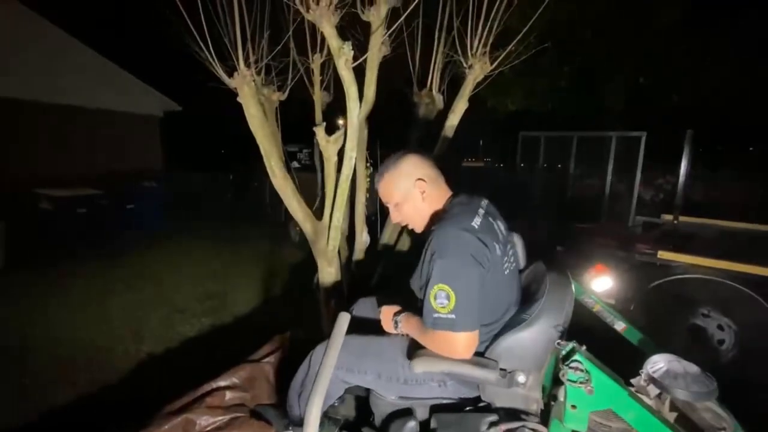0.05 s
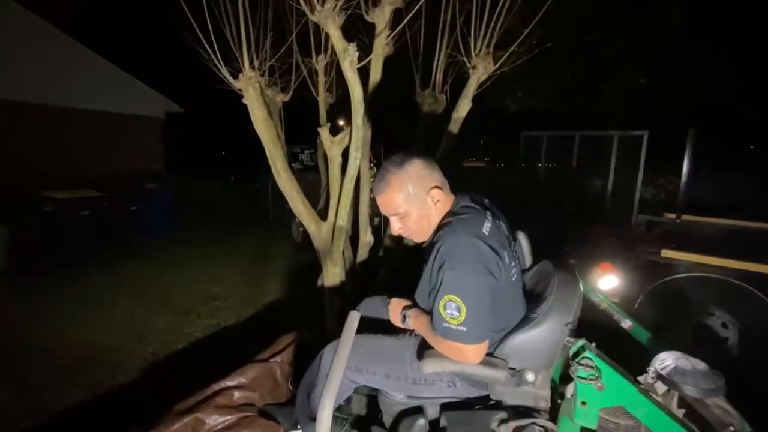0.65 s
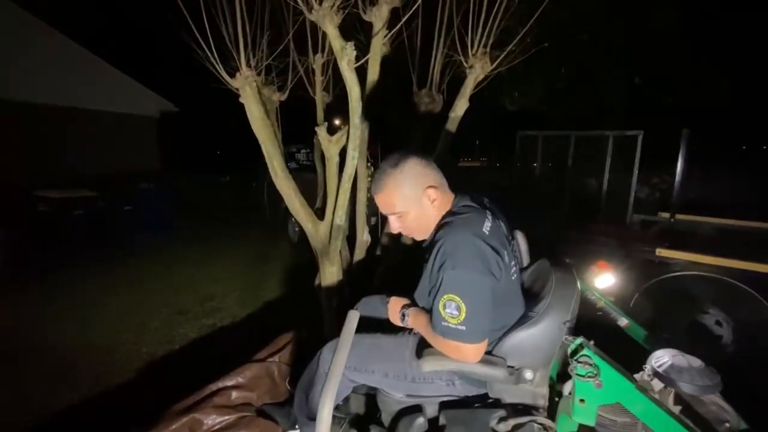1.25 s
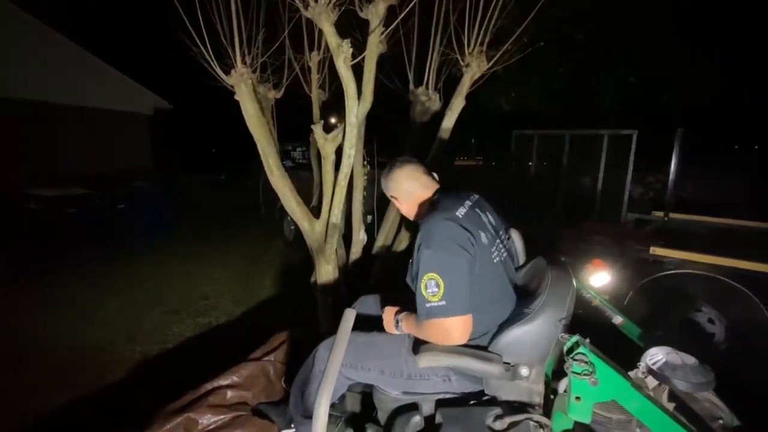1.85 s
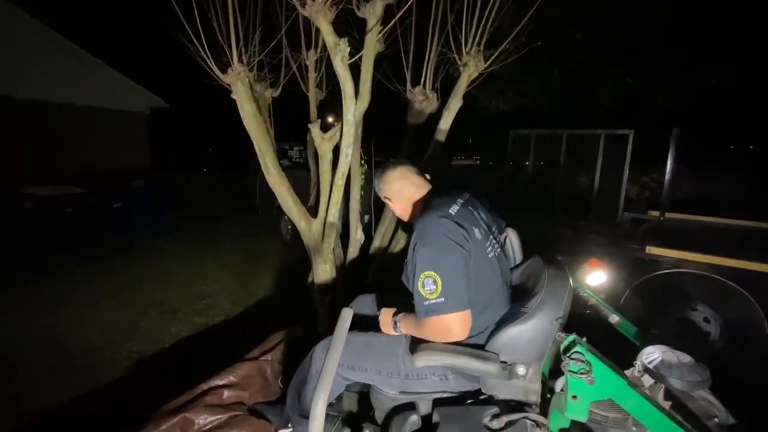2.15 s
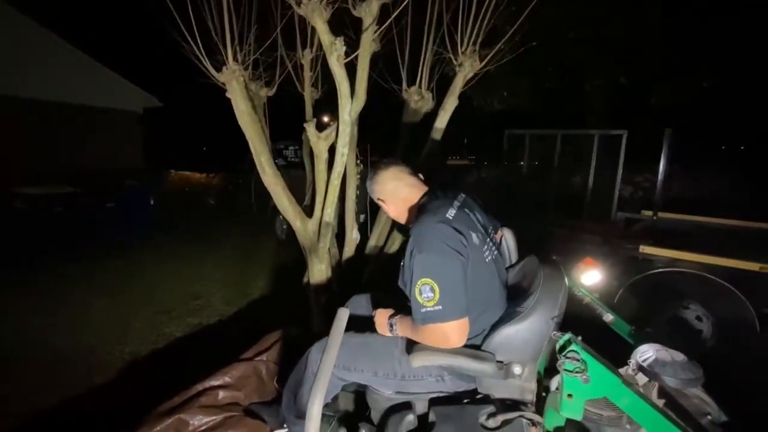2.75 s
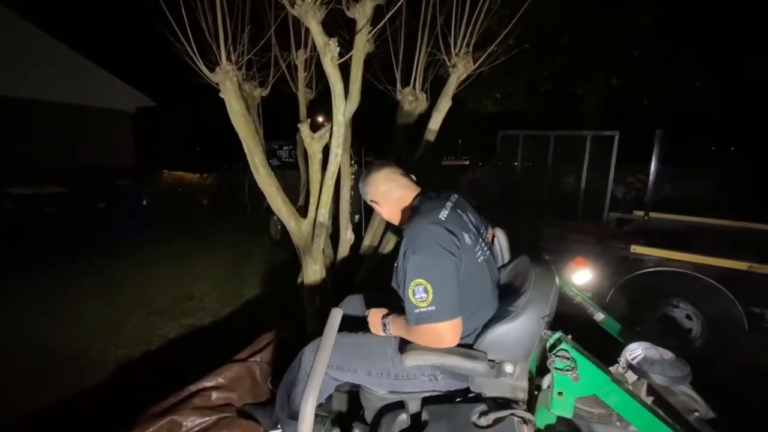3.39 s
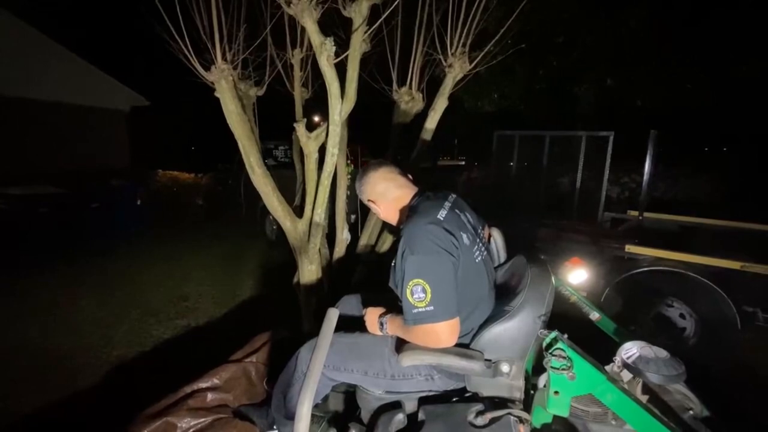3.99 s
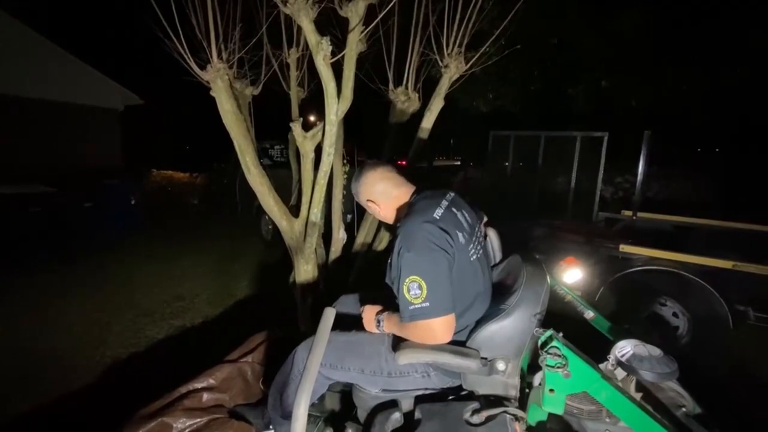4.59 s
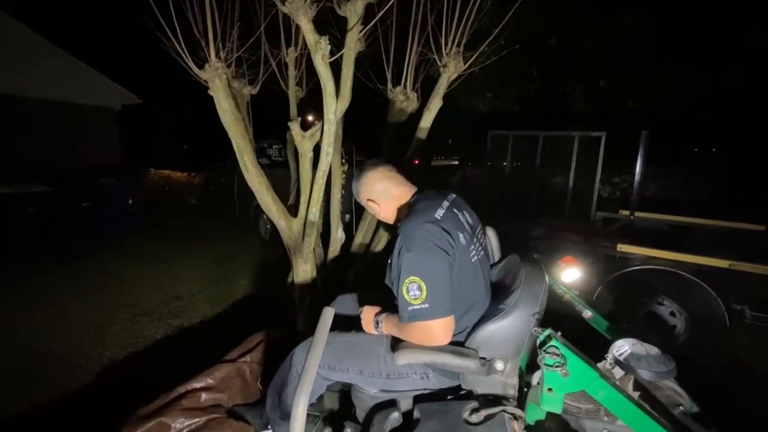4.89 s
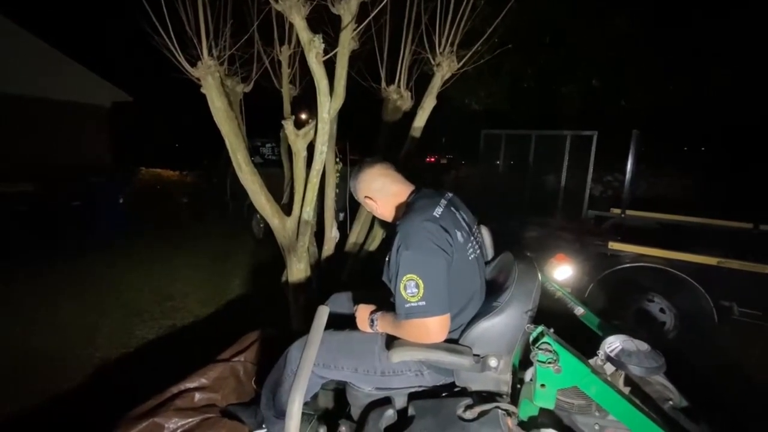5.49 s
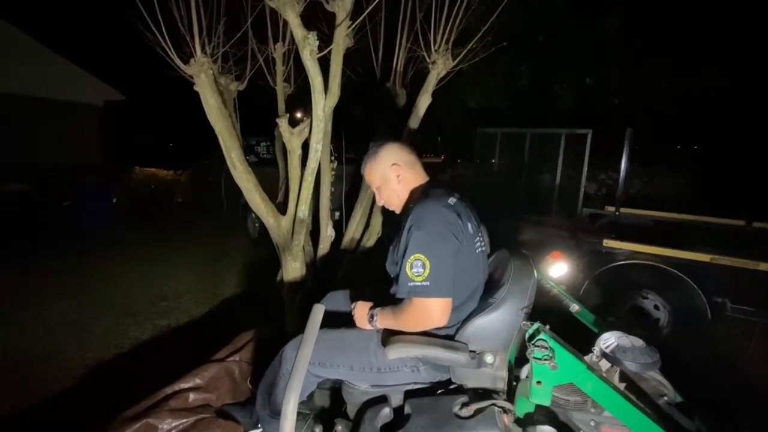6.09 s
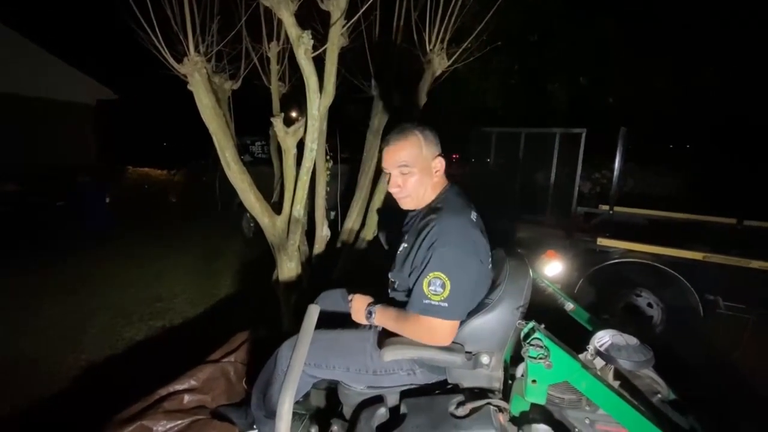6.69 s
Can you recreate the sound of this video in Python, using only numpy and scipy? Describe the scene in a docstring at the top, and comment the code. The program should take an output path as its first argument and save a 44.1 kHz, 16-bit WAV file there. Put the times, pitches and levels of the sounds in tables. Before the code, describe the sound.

A riding mower is started cold in a quiet yard, a metre or two from the microphone. The starter clanks in, grinds briefly and winds down with rattling gears and a few coughs. A second, longer try whines and chuffs without catching, then coasts to a stop. On the third try the engine fires, misses a few times and speeds up into a fast, chugging idle with mechanical clatter.

```python
"""Riding mower, cold start.

A V-twin is started outdoors at night, a metre or two from a stereo microphone. Twice the starter
slams in, grinds the engine over and coasts down; its gear teeth ring the frame and steel covers.
On the third try the cylinders catch, misfire a few times and settle into a fast idle: each firing
knocks the block and sends a slug of gas through the muffler, over valve gear and fan clatter."""
import sys
import numpy as np
from scipy import signal
from scipy.fft import rfft, irfft, next_fast_len
from scipy.io import wavfile

SR = 44100
rng = np.random.default_rng(int(sys.argv[2]) if len(sys.argv) > 2 else 0)


def dump(signal):
    """Clip the signal to [-1, 1] and save it as 16-bit WAV at the path in sys.argv[1]."""
    limited = np.clip(np.atleast_2d(signal).T, -1, 1)
    pcm = np.round(limited * 32767).astype(np.int16)
    wavfile.write(sys.argv[1], SR, pcm)


N = 297234
T = np.arange(N) / SR

# Width of the noise. Each row: frequency in Hz, share of power that differs between channels.
NOISE_WIDTH = [(300, 0.18), (600, 0.041), (1200, 0.46), (2500, 0.55), (4000, 1), (7000, 0.96), (9000, 0.48),
               (12000, 0.0038)]
# Distant hum. Each row: time in seconds, level in dB.
NIGHT_LEVEL = [(0, -42), (.4, -38), (1.9, -40.5), (4.5, -47), (6.74, -54)]
# Key, solenoid and pinion hits. Each row: start in seconds, level in dB, decay in seconds, frame share.
CLACK_HITS = [(0.272, -31, 0.026, 0.08), (0.486, -23.5, 0.026, 0.2), (0.501, -20, 0.12, 0.29),
              (0.859, -22.5, 0.03, 0.16), (0.894, -22, 0.01, 0.12), (1.034, -28, 0.04, 0.22),
              (1.135, -29.5, 0.029, 0.17), (1.316, -32, 0.027, 0.39), (1.348, -34.5, 0.04, 0.62),
              (1.9645, -23, 0.024, 0.27), (1.983, -19, 0.05, 0.76), (4.043, -30, 0.036, 0.47),
              (4.147, -27.5, 0.015, 0.18), (4.48, -44, 0.023, 0.03), (4.955, -30, 0.036, 0.071),
              (4.97, -22.5, 0.042, 0.11)]
# Starter tries. Each row: meshing time in seconds, key release in seconds, level in dB,
# flywheel teeth until the first exhaust stroke.
STARTER_TRIES = [(0.504, 0.845, 1.5, 86), (1.985, 3.879, 0.45, 86), (4.974, 5.325, 0.8, 91)]
# Starter baulking and surging. Each row: seconds since meshing, tooth rate in Hz.
TOOTH_RATE = [(0, 175), (.02, 195), (.045, 200), (.06, 270), (.075, 352), (.095, 392), (.112, 402),
              (.138, 388), (.153, 440), (.168, 528), (.2, 555), (.245, 545), (.275, 632), (.36, 640),
              (.7, 680)]
# Gear load. Each row: seconds since meshing, tooth force in dB, grinding in dB.
MESH_LOAD = [(0, -17.5, -9.5), (0.024, -14.5, -28.5), (.05, -24, -25), (.078, -20, -26),
             (0.106, -15.5, -21), (.135, -18.5, -23.5), (0.163, -23, -16.5), (.21, -26.5, -18.5),
             (.265, -19.5, -18.5), (.36, -20, -22.5), (.6, -17, -22.5)]
# Jolts of a loose cover. Each row: start in seconds, low mode in dB, high mode in dB.
COVER_JOLTS = [(.505, -43, -22), (.605, -34, -15), (0.663, -27, -12), (.752, -19, -14), (1.368, -34, -21),
               (2.135, -19, -14), (2.305, -18, -29), (2.408, -23, -17.5), (2.512, -20, -22),
               (2.68, -24, -42), (3.06, -41, -42), (3.22, -21, -20), (3.318, -17, -16), (5.128, -31, -23),
               (5.256, -11, -14)]
# Pinion jams. Each row: time in seconds, level in dB.
PINION_JAMS = [(.514, -12), (.580, -14), (0.677, -20), (2.008, -21), (2.060, -10), (2.145, -15),
               (2.241, -16), (5.048, -13.5), (5.104, -18)]
# Coughs as the engine runs on after a try. Each row: time in seconds, level in dB.
RUN_ON_COUGHS = [(.892, -13), (1.049, -18), (1.133, -12.5), (1.283, -17), (3.947, -24.5), (4.208, -27)]
# Pinion squeals. Each row: start in seconds, fade start in seconds, level in dB.
PINION_SQUEALS = [(0.733, .755, -29.5), (0.8, 0.81, -26.5), (2.366, 2.416, -29.5)]
# Freed gears. Each row: start in seconds, fade start in seconds, chatter in dB, frame ring in dB.
COAST_SPANS = [(0.923, 1.323, -30, -49), (1.352, 1.583, -25.5, -38.5), (1.647, 1.71, -36, -33.5),
               (3.866, 3.99, -26, -40.5), (4.056, 4.076, -30, -35)]
# Engine catching and picking up. Each row: time in seconds, four-stroke cycle rate in Hz.
CYCLE_RATE = [(5.31, 8.9), (5.44, 13.2), (5.52, 11.1), (5.61, 13.33), (5.87, 12.41), (5.99, 12.91),
              (6.1, 16.95), (6.22, 20.08), (6.36, 21.16), (6.74, 22.36)]
# Valve gear, fan and panels. Each row: time in seconds, level in dB.
CLATTER_LEVEL = [(5.31, -44.5), (5.45, -30.5), (6.0, -29), (6.2, -23.5), (6.45, -22.5), (6.74, -21)]
# Firings grow with fuel, then the governor trims. Each row: time in seconds, exhaust in dB, knock in dB.
FIRING_LEVEL = [(5.35, -15, -24), (5.41, -9, -24), (5.485, -4, -16.5), (5.525, -3.5, -17.5),
                (5.64, -2, -13), (5.96, -2, -13), (6.15, -2, -14.5), (6.35, -5.5, -20), (6.57, -10.5, -28),
                (6.72, -2.5, -15)]
# Failed or weak charges. Each row: time in seconds, exhaust change in dB, knock change in dB.
WEAK_FIRINGS = [(5.44, -26, -4), (5.483, -3, -3.5), (5.675, -30, -36), (5.723, -4, -11), (5.83, -23, -42),
                (5.881, -2.5, -5), (5.988, -26, -25)]
# Intake gulps. Each row: time in seconds, level in dB.
INTAKE_LEVEL = [(6.0, -27), (6.15, -6), (6.35, -10.5), (6.57, -14), (6.72, -10)]

# Resonances. Each row: frequency in Hz, bandwidth in Hz, relative level in dB.
FRAME_MODES = [(388.4, 13.2, 17.5), (525, 8.6, 19.5), (879, 37, 10.5), (1069, 39.5, 16.5), (1161, 28, 8),
               (1283, 11, 5.5), (1416, 14.4, 10.5), (1600, 20, 12), (1834, 34, 8.5), (2106, 23, 2.5),
               (2380, 21, -6)]
COVER_MODES = [(1905, 8, -1), (2200, 40, 1.5), (2514, 18, 11.5), (2870, 33, 3), (4836, 23, -7),
               (5290, 30, -12), (5850, 78, -13.5), (7300, 38, -3)]  # thin steel
HOUSING_MODES = [(664, 41, -8.5), (757, 36, 0), (917, 12, 0.5), (1097, 50, 9.5), (1257, 32, 5),
                 (1532, 33, 6), (1623, 26, 9.5), (1723, 26, 2), (1910, 12, 15.5), (2073, 40, 4.5),
                 (2350, 60, 1), (2616, 47, -4)]  # cast gear housing
CASING_MODES = [(3563, 40, 0.5), (4173, 45, -4), (4970, 87, -0.5), (5230, 52, 4.5), (5685, 70, 4)]  # starter casing
MUFFLER_MODES = [(62.6, 23.4, 2.5), (105.6, 11.5, -0.5), (142, 81, -2), (280, 510, -7)]
PANEL_MODES = [(362, 27, 5), (467, 12, 14.5), (600, 42, -3), (834, 83, 3), (1185, 42, 10), (1324, 56, -18),
               (1774, 18, 15), (1870, 17, 18), (7350, 67, -1)]
SQUEAL_MODES = [(4800, 170, 1), (5280, 120, 1), (5900, 220, -5)]
SHROUD_MODES = [(927, 13, 1), (1067, 43, 8)]  # flywheel shroud
FIN_MODES = [(7020, 27, 0)]  # cooling fins
BLOCK_MODES = [(455, 75, 4.5), (1140, 160, -15), (1610, 220, -22)]

# Noise spectra. Each row: frequency in Hz, relative level in dB.
NIGHT_SPECTRUM = [(25, -14), (55, 5.5), (110, -1.5), (200, -11.5), (500, -17), (1100, -17.5), (3000, -27),
                  (7000, -39.5), (10000, -34.5), (12000, -47), (16000, -98)]
CLACK_SPECTRUM = [(200, -50.5), (500, 14.5), (1100, 1.5), (2700, 10.5), (3800, 0.5), (7000, 0.5),
                  (11000, -5), (16000, -83)]
GRIND_SPECTRUM = [(150, -29), (270, -91), (390, -34), (445, -6), (520, 8.5), (620, -9.5), (950, -6.5),
                  (1300, -1), (2000, -3.5), (2700, -8), (3600, -17.5), (5300, -14), (11500, -16.5),
                  (16000, -31)]
COAST_SPECTRUM = [(150, -20), (280, -25), (390, 5.5), (520, 0.5), (700, -8.5), (1080, -3), (1400, -3),
                  (2200, -7), (2550, -1), (3600, -19), (7000, -14.5), (9000, -26), (10700, -12.5),
                  (16000, -67)]
CLATTER_SPECTRUM = [(50, -12), (150, 11), (280, -2), (480, 1.5), (650, -3.5), (1200, 3.5), (1850, -3),
                    (2700, -1), (4000, -8), (7400, -14), (11000, -55), (16000, -56)]
KNOCK_SPECTRUM = [(40, -35.5), (130, 19.5), (250, -6), (470, 14.5), (750, -2.5), (1150, 2.5), (1700, 0.5),
                  (2200, -3.5), (2550, -5), (3500, -7.5), (6500, -2), (8500, -5.5), (10700, -1),
                  (16000, -28.5)]

# Response of both microphone ports. Each row: frequency in Hz, gain in dB.
PORT_RESPONSE = [(100, -2), (9500, -3.5), (12000, 5.5), (13000, 6), (14200, -21), (16000, -34)]
# Port imbalance. Each row: frequency in Hz, left minus right in dB.
PORT_BALANCE = [(60, -3), (130, 0), (400, -6), (560, 6), (750, -8.5), (1100, 0.5), (1500, -1), (2400, 4),
                (4500, 2.5), (6200, 6.5), (7400, 9), (9000, -1), (16000, -0.5)]

TEETH_PER_CYCLE, SECOND_CYLINDER_LAG_CYCLES = 181.9, 3 / 8


def undb(db):
    """Decibels to gain."""
    return np.exp(np.asarray(db) * (np.log(10) / 20))


def noise():
    """Stereo noise of a wide source: alike in the bass, partly unrelated higher up."""
    size = next_fast_len(N)
    bin_hz = np.arange(size // 2 + 1) * SR / size
    share = np.clip(np.interp(bin_hz, *np.transpose(NOISE_WIDTH)), 0, 1)
    white = rfft(rng.standard_normal((3, size)))
    return irfft(np.sqrt(1 - share) * white[0] + np.sqrt(share) * white[1:], size)[:, :N]


def track(rows):
    """A (seconds, value) curve at every sample."""
    return np.interp(T, *np.transpose(rows))


def swell(start_s, end_s, db, attack_s, release_db_per_s, slope_db_per_s=0):
    """Gain that rises until the start, follows a slope and dies away after the end."""
    rise = np.clip(1 + (T - start_s) / attack_s, 0, 1)
    held_db = db + slope_db_per_s * np.maximum(T - start_s, 0)
    return rise * undb(held_db - release_db_per_s * np.maximum(T - end_s, 0))


def walk(rate_hz):
    """Random wander with a spread near 1."""
    knots_s = np.arange(0, T[-1] + 1, 1 / rate_hz)
    return np.interp(T, knots_s, np.resize(rng.standard_normal(4096), len(knots_s)))


def colour(x, points, keep_power=True):
    """Minimum-phase filter through (Hz, dB) points."""
    size = 8192
    hz, db = np.transpose(points)
    bin_hz = np.arange(size // 2 + 1) * SR / size
    gain = undb(np.interp(np.log(bin_hz + 1), np.log(hz), db))
    if keep_power:
        gain = gain / np.sqrt(np.mean(gain ** 2))
    cepstrum = irfft(np.log(gain), size)
    cepstrum[1:size // 2] *= 2
    cepstrum[size // 2 + 1:] = 0
    return convolve(x, irfft(np.exp(rfft(cepstrum)), size))


def response(modes):
    """Unit-energy ring of damped modes after one blow."""
    t = T[:SR // 4]
    ring = sum(undb(db) * width_hz * np.exp(-np.pi * width_hz * t) * np.cos(2 * np.pi * hz * t)
               for hz, width_hz, db in modes)
    return ring / np.sqrt(np.sum(ring ** 2))


def convolve(x, h):
    """Pass each channel through an impulse response."""
    return signal.oaconvolve(np.atleast_2d(x), np.atleast_2d(h), axes=1)[:, :N]


def resonate(x, modes):
    """Drive a set of modes."""
    return convolve(x, response(modes))


def impulses(times_s, sizes):
    """Clicks, each shared between two neighbouring samples."""
    at = np.asarray(times_s) * SR
    i = at.astype(int)
    return np.bincount(i, sizes * (1 - at + i), N)[:N] + np.bincount(i + 1, sizes * (at - i), N)[:N]


def lean_left(x, db):
    """Set the left channel this far above the right."""
    return x * undb([[db / 2], [-db / 2]])


def stroke_times(cycles, first):
    """Seconds at which the crank passes one angle, once a cycle from the first on."""
    return T[np.searchsorted(cycles, np.arange(first, cycles[-1], 1))]


def night_air():
    """Distant low hum."""
    return colour(noise(), NIGHT_SPECTRUM) * undb(track(NIGHT_LEVEL) + 0.13 * walk(4.7))


def clacks():
    """Steel hits steel: a burst of chatter that also rings the frame."""
    burst, push = np.zeros(N), np.zeros(N)
    t = T[:SR // 4]
    for start_s, db, decay_s, frame_share in CLACK_HITS:
        span = int(start_s * SR) + np.arange(len(t))
        blow = undb(db) * np.exp(-t / decay_s)
        burst[span] += blow
        push[span] += frame_share * blow
    return colour(noise() * burst, CLACK_SPECTRUM) + 3.4 * resonate(noise() * push, FRAME_MODES)


def starter_spin(start_s, release_s, lead_teeth, drop_out_s=0.1, slowing_hz_per_s=920):
    """The starter spins up, slows on key release and drops out; cycles count from the first exhaust."""
    meshed = (T >= start_s) & (T <= release_s + drop_out_s)
    tooth_hz = np.interp(T - start_s, *np.transpose(TOOTH_RATE))
    tooth_hz -= slowing_hz_per_s * np.clip(T - release_s, 0, drop_out_s)
    cycles = (np.cumsum(tooth_hz * meshed) / SR - lead_teeth) / TEETH_PER_CYCLE
    return meshed, tooth_hz, cycles


def starter(start_s, release_s, db, lead_teeth, fade_db_per_s=208, wear_db=2, brush_db=-13):
    """One try: tooth blows, their shove on the frame, tooth scraping and brush whistle."""
    meshed, tooth_hz, cycles = starter_spin(start_s, release_s, lead_teeth)
    age_s, force_db, grinding_db = np.transpose(MESH_LOAD)
    settled = np.clip((T - start_s - 0.25) / 0.15, 0, 1)
    strain = settled * np.cos(2 * np.pi * 3 * (cycles + 0.035))  # pistons and valve springs
    drive = meshed * undb(db - fade_db_per_s * np.maximum(T - release_s, 0))
    force = drive * undb(np.interp(T - start_s, age_s, force_db) + 2 * strain)
    grinding = drive * undb(np.interp(T - start_s, age_s, grinding_db) - strain)
    dips = strain - 0.3 * (2 * strain ** 2 - settled ** 2)  # sharp at each compression
    tooth_hz = tooth_hz * (1 + 0.042 * dips + 0.008 * walk(70))
    teeth_passed = np.cumsum(tooth_hz * meshed) / SR
    times_s = np.interp(np.arange(int(teeth_passed[-1])), teeth_passed[meshed], T[meshed])
    timing, size = rng.standard_normal((4096, 2))[:len(times_s)].T
    slack_s = 30e-6 * (1 + (300 / np.interp(times_s, T, tooth_hz)) ** 6)  # slow teeth hit unevenly
    teeth = impulses(times_s + slack_s * timing, undb(0.5 * np.tanh(size))) * np.sqrt(SR / tooth_hz)
    scrape = grinding * (1 + 0.39 * np.cos(2 * np.pi * teeth_passed))
    commutator = np.sin(2 * np.pi * 7.5 * teeth_passed)
    brushes = undb(brush_db) * grinding * (tooth_hz / 700) ** 2 * walk(250) * commutator
    teeth = teeth * force * undb(wear_db * walk(45))
    torque = 1 - tooth_hz / TOOTH_RATE[-1][1]
    return teeth, teeth * torque, scrape, brushes


def cranking(backlash=0.09, grit_db=3):
    """The teeth ring and rock the frame; after each compression the flywheel overruns and rattles."""
    teeth, shoves, scrape, brushes = np.sum([starter(*row) for row in STARTER_TRIES], axis=0)
    puffs_s, _ = crank_puffs()
    overrun = convolve(impulses(puffs_s, np.ones(len(puffs_s))), np.hanning(int(0.055 * SR)))
    load = undb(0.5 * overrun - 2)
    rasp = noise() * scrape * undb(np.tanh(walk(130)) + grit_db * np.tanh(walk(1200)))
    rattle = noise() * scrape * (1 + backlash * overrun)
    frame = resonate(undb(1.5) * teeth * load + undb(-10) * rattle, FRAME_MODES)
    rocking = undb(-12) * resonate(shoves, FRAME_MODES[:1])
    covers = undb(-8) * resonate(rattle + 0.06 * teeth, COVER_MODES)
    grind = (undb(-2.5) * colour(rasp, GRIND_SPECTRUM) + brushes) * load
    housing = undb(-6) * loose_parts(scrape)
    whine = undb(-19) * resonate(teeth, CASING_MODES)
    return lean_left(shaken(frame + covers) + rocking + housing + grind + whine, db=1)


def loose_parts(gain, knocks_per_s=150, spread_db=4, contact_s=0.0015):
    """Random short contacts, some hard and many soft, ring the gear housing."""
    count = int(knocks_per_s * T[-1])
    times_s = rng.random(count) * T[-1]
    sizes = undb(spread_db * np.minimum(rng.standard_normal(count), 2))
    contacts = convolve(impulses(times_s, sizes), np.exp(-T[:SR // 50] / contact_s))
    knocks = noise() * contacts / np.sqrt(np.mean(contacts ** 2))
    return resonate(knocks * gain, HOUSING_MODES)


def shaken(x):
    """The shaking machine makes its rings waver, the high ones most."""
    delay_s = 50e-6 * walk(170) + 120e-6 * walk(35)
    return np.array([np.interp(T - delay_s, T, channel) for channel in x])


def cover_jolts(modes_hz=(1910, 2520), attack_s=0.0047, flutter_db=2):
    """A jolted cover rings briefly, its two modes wavering as it shifts on its bolts."""
    starts_s, *mode_levels_db = np.transpose(COVER_JOLTS)
    ring = 0
    for hz, levels_db in zip(modes_hz, mode_levels_db):
        gain = sum(swell(peak_s, peak_s, db, attack_s, release_db_per_s=478)
                   for peak_s, db in zip(starts_s + attack_s, levels_db))
        gain *= undb(flutter_db * walk(300))
        phase = 2 * np.pi * np.cumsum(hz * (1 + 0.00707 * walk(120))) / SR
        ring += gain * np.sin(phase)
    return shaken(lean_left(np.sqrt(2) * ring, db=3))


def pinion_jams(pitch_hz=1072, rise_hz_per_s=5000, hold_s=0.007, rasp_db=-7):
    """The pinion sticks on a tooth, barks at a rising pitch and rasps through the housing."""
    tone, grip = 0, 0
    for start_s, db in PINION_JAMS:
        age_s = T - start_s
        gain = swell(start_s, start_s + hold_s, db, attack_s=0.0044, release_db_per_s=1096)
        tone += gain * np.sin(2 * np.pi * age_s * (pitch_hz + rise_hz_per_s * age_s / 2))
        grip += gain
    return np.sqrt(2) * tone + undb(rasp_db) * resonate(noise() * grip, HOUSING_MODES)


def crank_puffs(first_db=-21.5, second_db=-25):
    """Times and levels: each cranked cylinder breathes out once a cycle; coughs follow the release."""
    rows = list(RUN_ON_COUGHS)
    for start_s, release_s, _, lead_teeth in STARTER_TRIES:
        _, _, cycles = starter_spin(start_s, release_s, lead_teeth)
        for first, db in [(0, first_db), (SECOND_CYLINDER_LAG_CYCLES, second_db)]:
            rows += [(time_s, db) for time_s in stroke_times(cycles, first) if time_s < release_s]
    return np.transpose(rows)


def gas_pulses(times_s, levels_db, valve_s=0.0089, rush_db=-25):
    """At each valve opening a rounded slug of gas rings the muffler and rushes through the panels."""
    slug = np.sin(np.pi * np.minimum(T[:SR // 40] / valve_s, 1)) ** 2
    thump = np.convolve(slug, response(MUFFLER_MODES))
    pulses = impulses(times_s, undb(levels_db))
    rush = resonate(noise() * convolve(pulses, slug), PANEL_MODES)
    return convolve(pulses, thump / np.max(np.abs(thump))) + undb(rush_db) * rush


def pinion_squeals(grit_db=3):
    """The pinion slides along the flywheel teeth in short gritty squeals."""
    gain = sum(swell(*row, attack_s=0.028, release_db_per_s=402, slope_db_per_s=-2)
               for row in PINION_SQUEALS)
    return resonate(noise() * gain * undb(grit_db * np.tanh(walk(840))), SQUEAL_MODES)


def coasting():
    """Unloaded gears chatter to rest, ringing frame, covers, shroud and housing."""
    shape = dict(attack_s=0.018, release_db_per_s=93, slope_db_per_s=0.5)
    gears = noise() * undb(1.12 * walk(150) + 0.39 * walk(35))
    turning = sum(swell(start_s, end_s, db, **shape) for start_s, end_s, db, _ in COAST_SPANS)
    chatter = gears * turning
    shaking = gears * sum(swell(start_s, end_s, db, **shape) for start_s, end_s, _, db in COAST_SPANS)
    ring = resonate(shaking, FRAME_MODES) + undb(-14) * resonate(chatter, COVER_MODES)
    shroud = undb(-2) * resonate(shaking, SHROUD_MODES)
    housing = undb(-11) * loose_parts(turning)
    return 0.46 * colour(chatter, COAST_SPECTRUM) + 0.44 * ring + shroud + housing


def groan(pitch_hz=392):
    """After the first try a rubbing part groans near the frame's lowest mode."""
    phase = 2 * np.pi * np.cumsum(pitch_hz * (1 + 0.00525 * walk(61.5))) / SR
    rub = swell(start_s=0.99, end_s=1.345, db=-33.5, attack_s=0.016,
                release_db_per_s=350, slope_db_per_s=13)
    return (np.sin(phase) + undb(-10) * np.sin(4 * phase)) * rub * undb(2.2 * walk(31.2))


def clatter(ticks_per_cycle=40):
    """Valve gear ticks at the same crank angles each cycle, over fan noise, panels and linkage."""
    cycles = np.cumsum(track(CYCLE_RATE)) / SR
    angles, sizes = rng.random(ticks_per_cycle), rng.standard_normal(ticks_per_cycle)
    tick_cycles = (np.arange(int(cycles[-1]) + 1)[:, None] + angles).ravel()
    tick_cycles = tick_cycles[tick_cycles < cycles[-1]]
    ticks = impulses(np.interp(tick_cycles, cycles, T), np.resize(sizes, len(tick_cycles)))
    ticks /= np.std(ticks)
    gain = (T >= CYCLE_RATE[0][0]) * undb(track(CLATTER_LEVEL) + 0.71 * walk(60))
    panels = resonate((0.97 * ticks + noise()) * gain, PANEL_MODES)
    linkage = loose_parts(gain)
    direct = colour((0.18 * ticks + noise()) * gain, CLATTER_SPECTRUM)
    return direct + undb(-6) * (panels + linkage)


def running_cycles():
    """Four-stroke cycles turned since the engine caught."""
    return np.cumsum(track(CYCLE_RATE) * (T >= CYCLE_RATE[0][0])) / SR


def firings(scatter_db=1.25):
    """Times, exhaust and knock levels of two unevenly spaced firings a cycle; some fail while cold."""
    cycles = running_cycles()
    knots_s, exhaust_curve_db, knock_curve_db = np.transpose(FIRING_LEVEL)
    rows = []
    for first, exhaust_trim_db, knock_trim_db in [(1, 0, 0), (SECOND_CYLINDER_LAG_CYCLES, -0.5, -1.5)]:
        times_s = stroke_times(cycles, first)
        burn_db = scatter_db * rng.standard_normal(len(times_s))  # no two charges burn alike
        exhaust_db = np.interp(times_s, knots_s, exhaust_curve_db) + exhaust_trim_db + burn_db
        knock_db = np.interp(times_s, knots_s, knock_curve_db) + knock_trim_db + 2 * burn_db
        rows += zip(times_s, exhaust_db, knock_db)
    rows = np.array(rows)
    for time_s, *change_db in WEAK_FIRINGS:
        nearest = np.argmin(abs(rows[:, 0] - time_s))
        rows[nearest, 1:] += change_db
    return rows.T


def combustion(knock_s=0.01, tail_s=0.04, burn_s=0.00202, valve_lag_s=0.00786):
    """Each firing cracks through covers and fins and makes the block bark; the exhaust follows."""
    times_s, exhaust_db, knock_db = firings()
    t = T[:SR // 6]
    decay = np.exp(-t / knock_s) + 0.13 * np.exp(-t / tail_s)
    blows = convolve(impulses(times_s, undb(knock_db)), decay)
    crack = noise() * blows * undb(0.1 * walk(740))
    knock = 1.21 * colour(crack, KNOCK_SPECTRUM) + undb(-12) * resonate(crack, COVER_MODES)
    fins = undb(-15) * resonate(crack, FIN_MODES)
    block = response(BLOCK_MODES)
    bark = undb(2) * convolve(impulses(times_s + burn_s, undb(knock_db)), block / np.max(np.abs(block)))
    exhaust = gas_pulses(times_s + valve_lag_s, exhaust_db - 0.5)
    return knock + bark + fins + exhaust


def intake(lag_cycles=0.23, valve_lag_s=0.0064):
    """As the revs rise, a hollow gulp of air between the two firings makes a three-beat chug."""
    times_s = stroke_times(running_cycles(), 1 + lag_cycles)
    times_s = times_s[times_s > INTAKE_LEVEL[0][0]]
    return gas_pulses(times_s + valve_lag_s, np.interp(times_s, *np.transpose(INTAKE_LEVEL)))


def yard(x, left_delay_samples=9, scatter_s=0.014, scatter_db=-17):
    """Sound reaches the right port first; a trailer and trees scatter a little back."""
    t = T[:SR // 4]
    direct = np.array([np.pad(x[0], (left_delay_samples, 0))[:N], x[1]])
    echoes = rng.standard_normal((2, len(t))) * np.exp(-t / scatter_s) * np.sqrt(2 / (scatter_s * SR))
    return direct + undb(scatter_db) * convolve(x, echoes)


def scene():
    """Night air, starter and engine in the open yard."""
    night = night_air()
    chuffs = gas_pulses(*crank_puffs(), valve_s=0.011, rush_db=-36)  # slow crank: valve open longer
    running = (combustion() + intake() + clatter()) * undb([[-0.6], [0.8]])  # muffler to the right
    starting = cranking() + pinion_jams() + cover_jolts() + pinion_squeals()
    run_down = coasting() + groan()
    return yard(night + clacks() + starting + chuffs + run_down + running)


def record(dry, rumble_hz=50, ceiling=0.92, top_hz=16000):
    """Two unlike microphone ports resonate in the treble; peaks are rounded, rumble and top cut."""
    left = colour(dry[0], [(hz, db / 2) for hz, db in PORT_BALANCE], keep_power=False)
    right = colour(dry[1], [(hz, -db / 2) for hz, db in PORT_BALANCE], keep_power=False)
    ports = colour(np.vstack([left, right]), PORT_RESPONSE, keep_power=False)
    ports = signal.sosfilt(signal.butter(2, rumble_hz, "high", fs=SR, output="sos"), ports)
    rounded = ports / (1 + (ports / ceiling) ** 6) ** (1 / 6)
    return signal.sosfilt(signal.ellip(8, 0.2, 70, top_hz, fs=SR, output="sos"), rounded)


dry = scene()
out = record(dry)
dump(out)
```